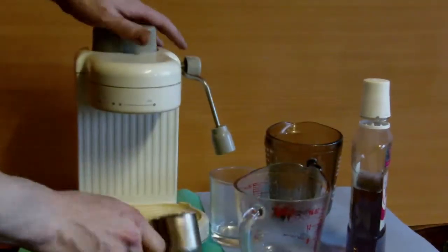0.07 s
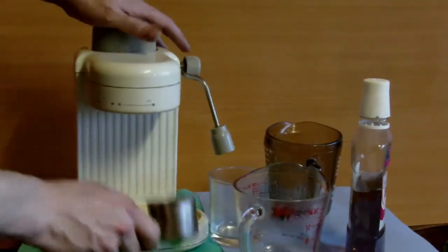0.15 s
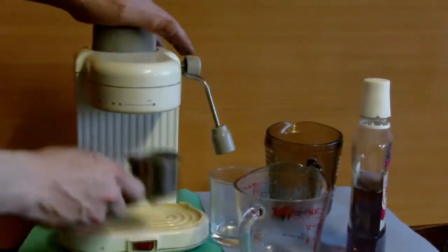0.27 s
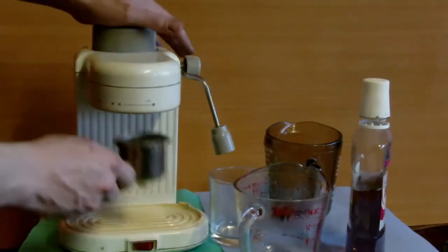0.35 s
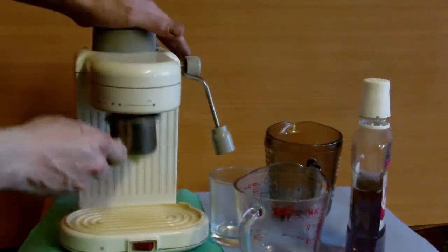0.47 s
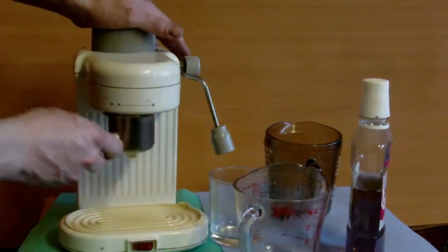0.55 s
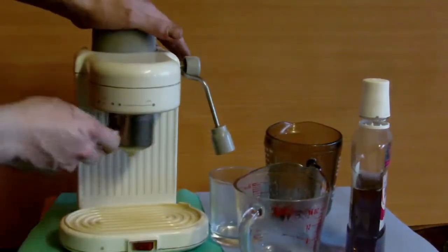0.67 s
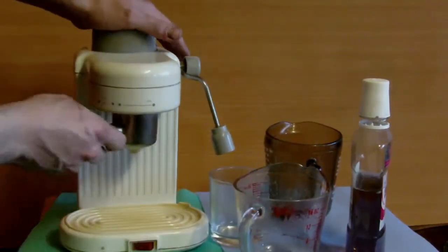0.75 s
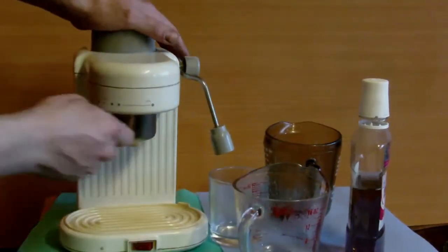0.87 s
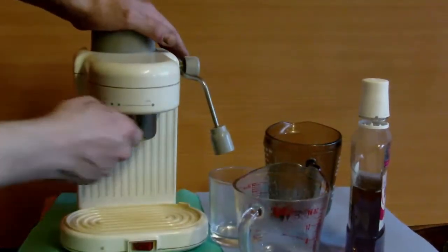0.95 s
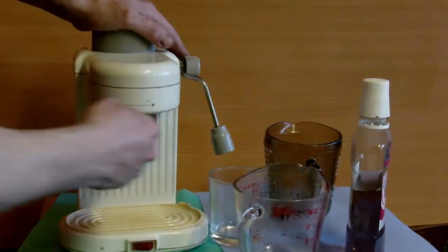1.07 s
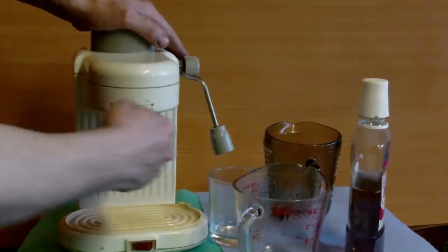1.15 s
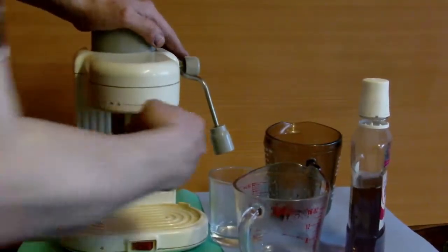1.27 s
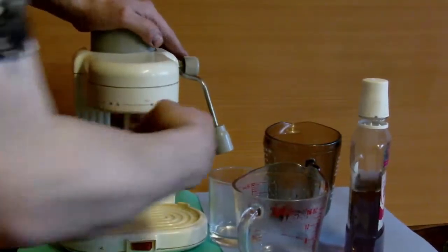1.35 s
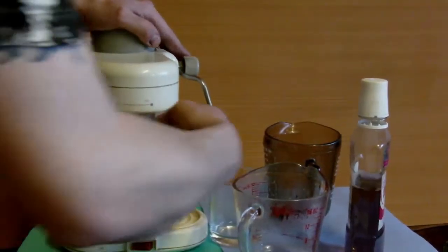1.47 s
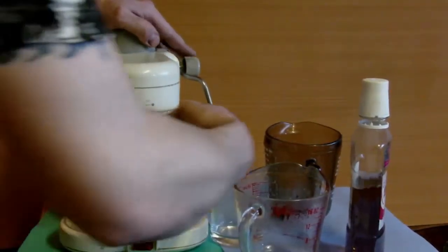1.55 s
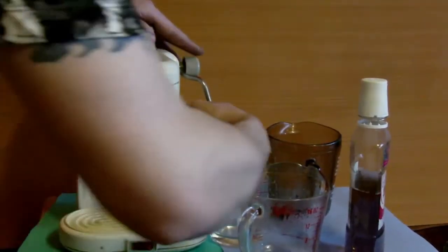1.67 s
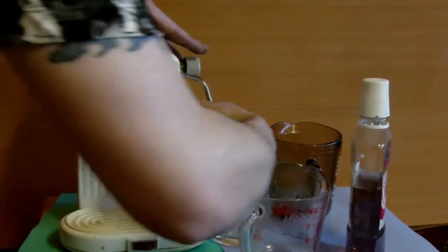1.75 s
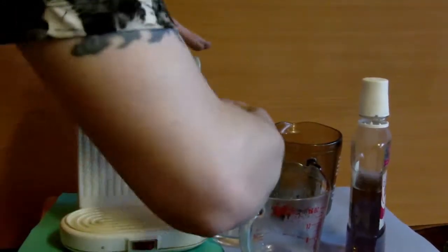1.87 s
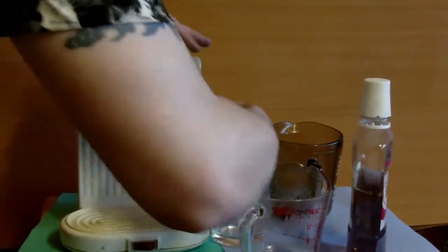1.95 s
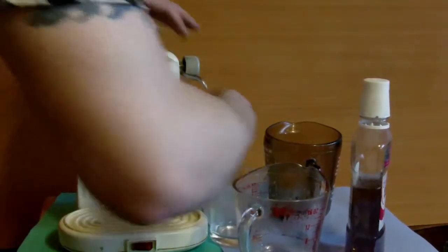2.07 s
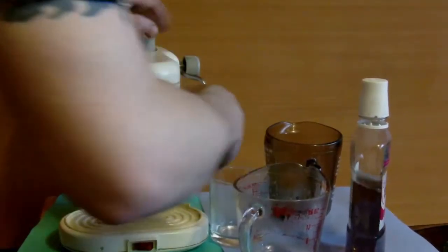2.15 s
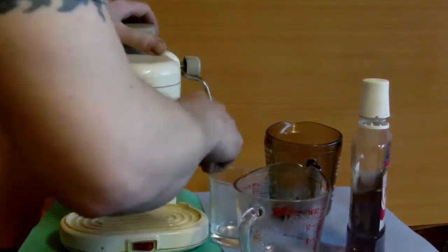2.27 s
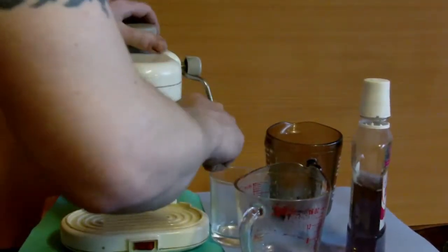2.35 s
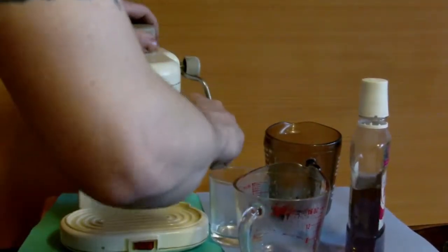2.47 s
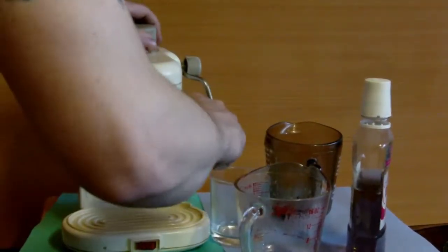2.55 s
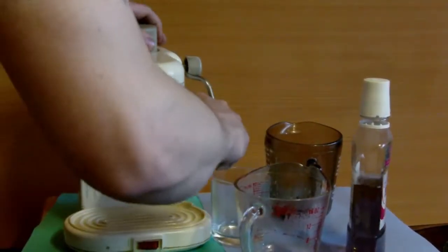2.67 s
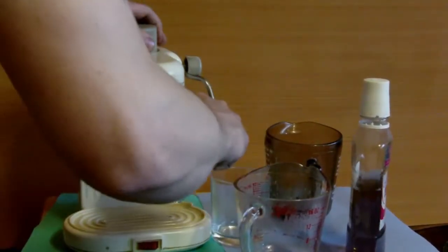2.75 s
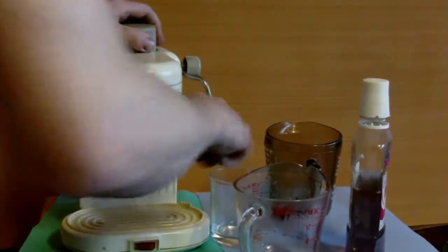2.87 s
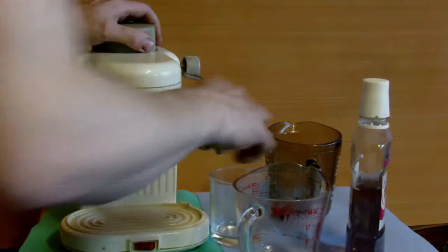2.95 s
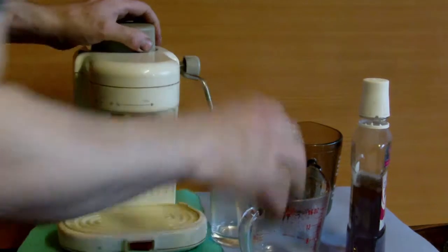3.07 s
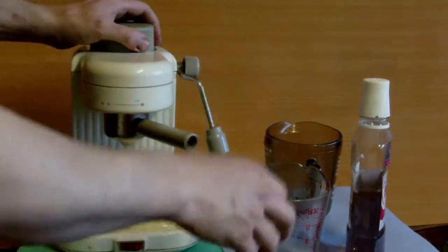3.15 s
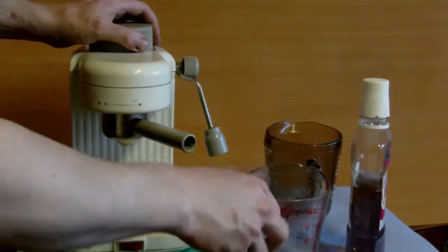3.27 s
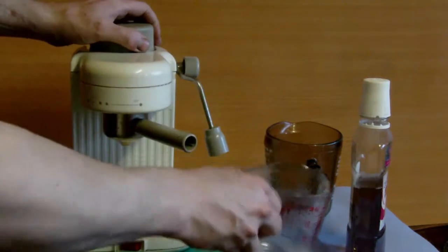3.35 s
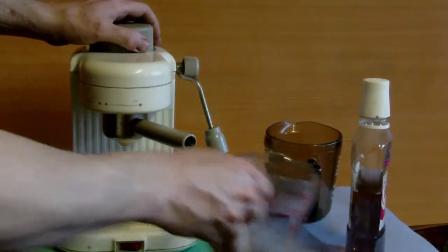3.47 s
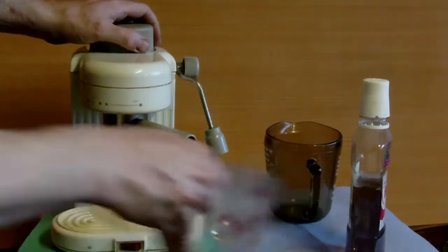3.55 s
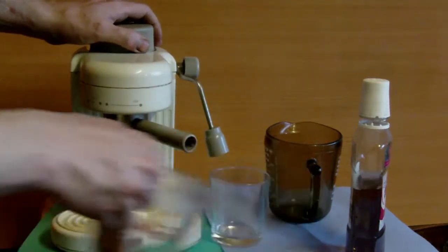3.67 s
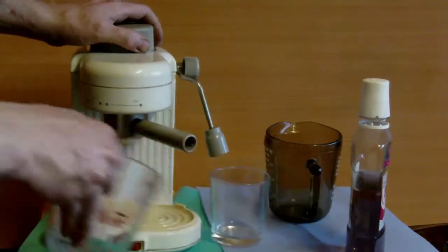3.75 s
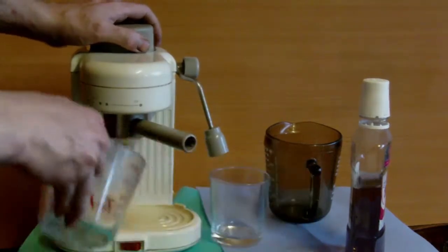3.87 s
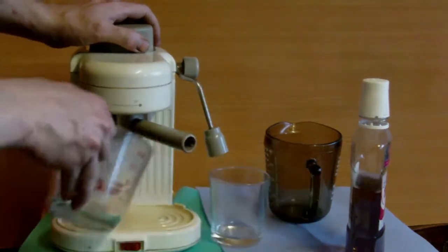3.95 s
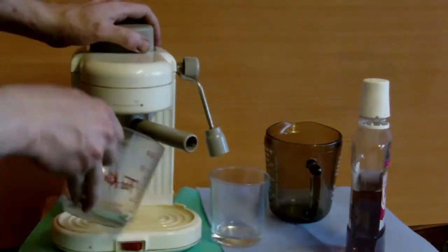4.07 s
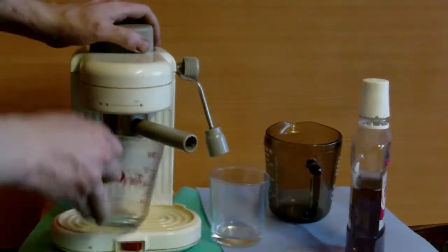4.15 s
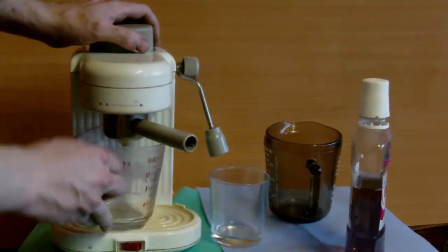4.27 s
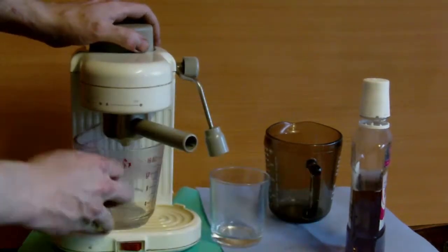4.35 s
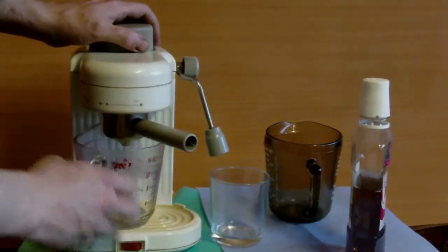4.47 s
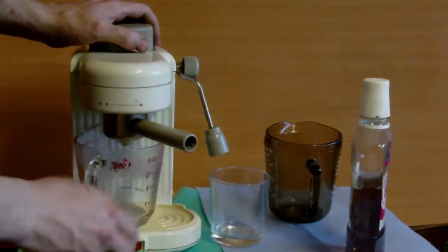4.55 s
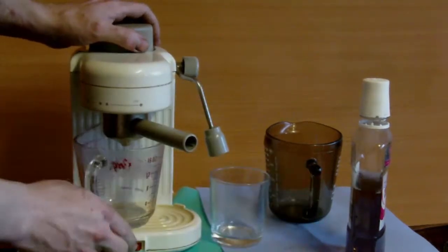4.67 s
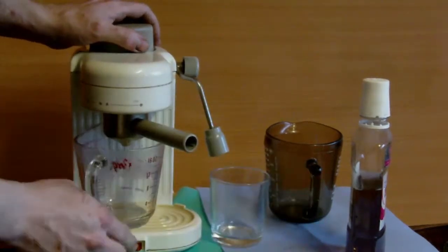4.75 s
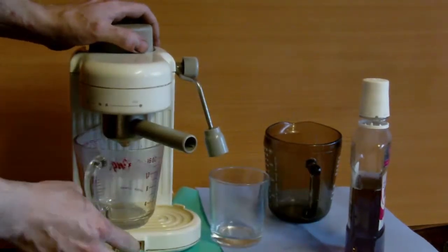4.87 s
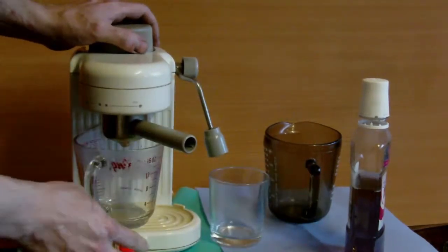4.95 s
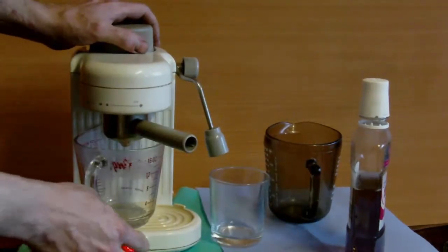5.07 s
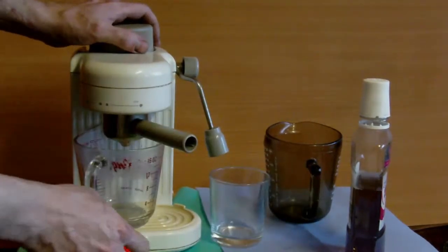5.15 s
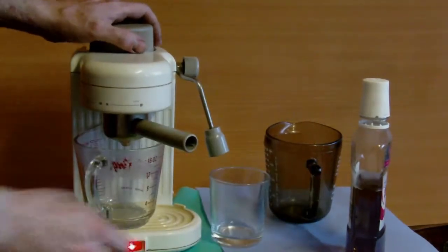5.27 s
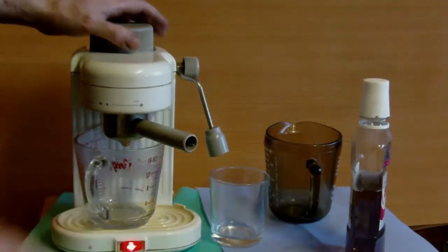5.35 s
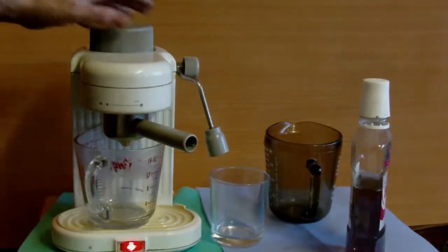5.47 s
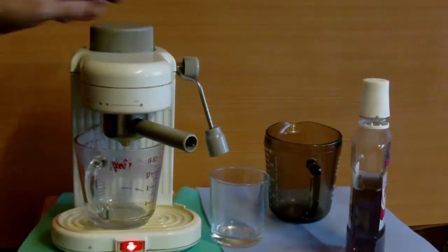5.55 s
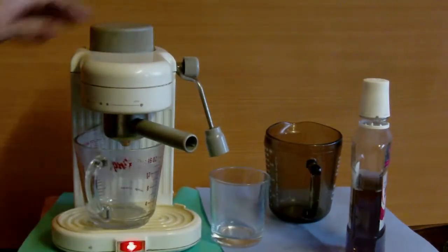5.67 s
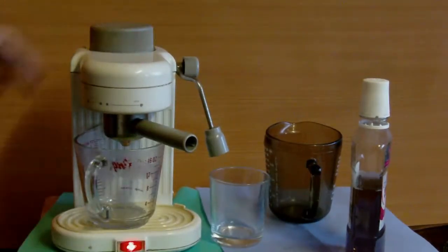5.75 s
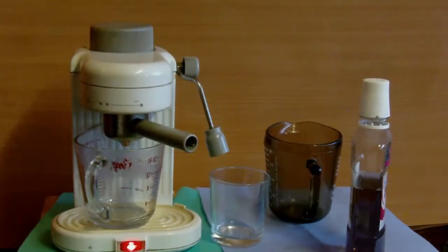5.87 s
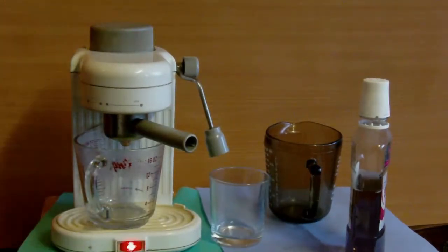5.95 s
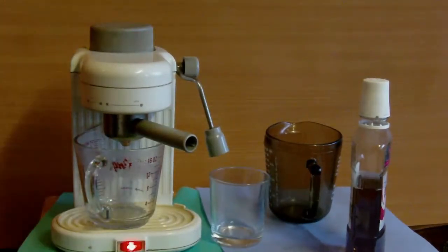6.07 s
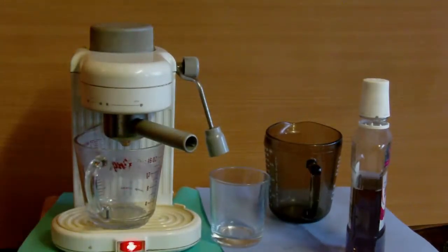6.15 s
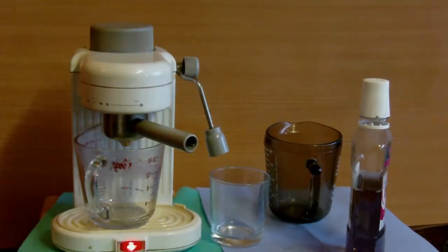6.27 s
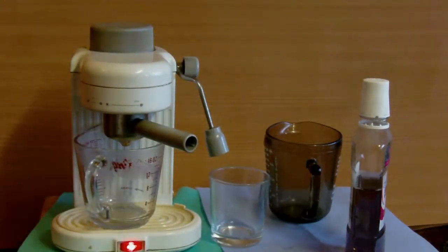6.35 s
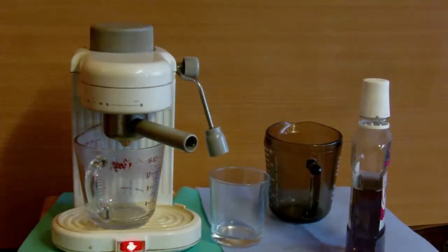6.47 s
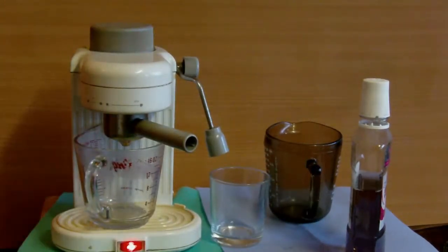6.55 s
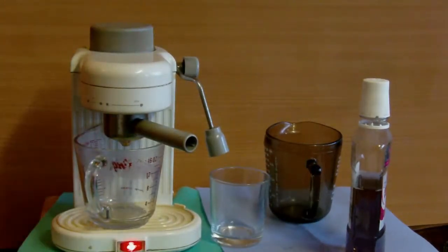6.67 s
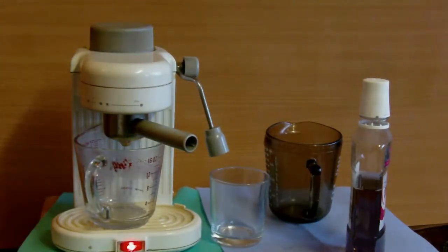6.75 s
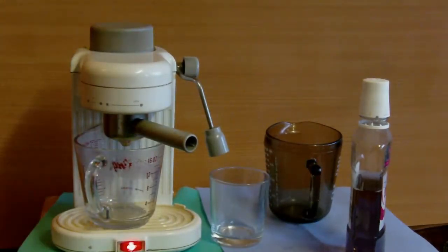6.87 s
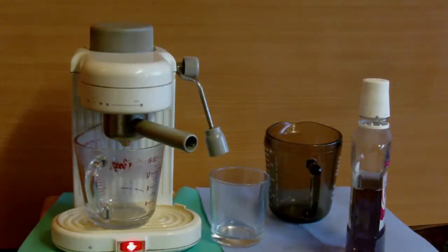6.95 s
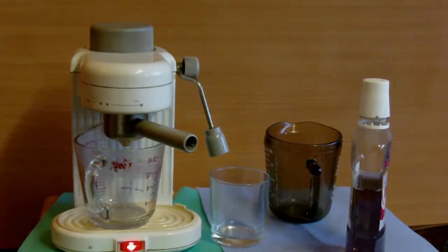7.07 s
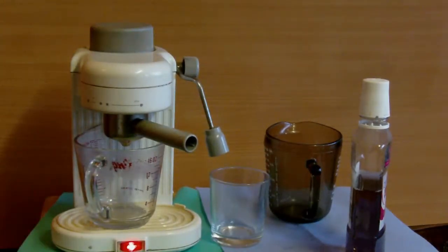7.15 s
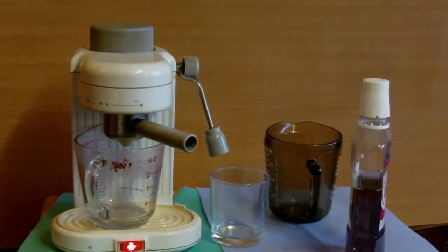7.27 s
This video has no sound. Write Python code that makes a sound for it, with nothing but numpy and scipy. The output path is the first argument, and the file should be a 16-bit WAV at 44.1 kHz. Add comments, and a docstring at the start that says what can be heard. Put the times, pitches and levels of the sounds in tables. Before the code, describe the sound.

A metal coffee holder grinds and squeaks into an espresso machine, a glass jug clatters onto the tray, and a switch snaps.

```python
"""The scene opens on a steel coffee holder's dying ring and one quick knock on a plastic machine.
The holder rattles, grinds and squeals by stick-slip friction as it is twisted tight. A glass jug is
tipped under it onto the drip tray, the power switch snaps, and a soft hiss swells at the end. Each
impact excites the damped normal modes of the object struck. The small kitchen reverberates and hums
faintly, and a close microphone overloads on the hardest blows."""
import sys
import numpy as np
from scipy import signal
from scipy.fft import rfft, irfft
from scipy.io import wavfile
from scipy.ndimage import uniform_filter1d

SR = 44100
rng = np.random.default_rng(int(sys.argv[2]) if len(sys.argv) > 2 else 0)


def pcm_store(signal):
    """Save signal as 16-bit PCM."""
    levels = np.round(np.clip(np.atleast_2d(signal), -1, 1) * 32767)
    wavfile.write(sys.argv[1], SR, levels.astype(np.int16).T)


N = 321930


def amp(db):
    """Amplitude ratio of a level in decibels."""
    return 10 ** (np.asarray(db) / 20)


def unit_rms(x):
    """Normalisation to unit mean power."""
    return x / np.sqrt(np.mean(x ** 2) + 1e-20)


def curve_at(points, hz):
    """Interpolation on a logarithmic frequency axis."""
    f, value = np.transpose(points)
    return np.interp(np.log(hz + 1), np.log(f + 1), value)


def add(mix, s, sound):
    """Superposition of a sound starting at s seconds."""
    part = mix[round(s * SR):][:len(sound)]
    part += sound[:len(part)]


def colour(x, spectrum):
    """Minimum-phase filter: the phase is the Hilbert transform of the log gain."""
    size = 2 * len(x)
    log_gain = np.log(amp(curve_at(spectrum, abs(np.fft.fftfreq(size, 1 / SR)))))
    response = np.exp(np.conj(signal.hilbert(log_gain)))
    return np.fft.ifft(np.fft.fft(x, size) * response).real[:len(x)]


def hump(t, rise, fall):
    """Asymmetric Gaussian envelope peaking at t = 0."""
    return np.exp(-.5 * (t / np.where(t < 0, rise, fall)) ** 2)


def swells(rows):
    """Incoherent addition: overlapping envelopes sum in power."""
    t = np.arange(N) / SR
    return np.sqrt(sum((amp(db) * hump(t - s, rise, fall)) ** 2 for s, db, rise, fall in rows))


def noise(spectrum):
    """Spectral shaping of white noise, at unit power."""
    gain = amp(curve_at(spectrum, np.fft.rfftfreq(N, 1 / SR)))
    return unit_rms(irfft(rfft(rng.standard_normal(N)) * gain, N))


def hums(bands):
    """Narrow-band noise: neighbouring components beat, so each tone wavers."""
    hz, out = np.fft.rfftfreq(N, 1 / SR), np.zeros(N)
    for centre, width, db in bands:
        band = rfft(rng.standard_normal(N)) / (1 + ((hz - centre) / (width / 2)) ** 2)
        out += amp(db) * unit_rms(irfft(band, N))
    return out


def ringing(modes, rough, detune=0., spot_db=1.8, steady_hz=3300):
    """Modal decay: the contact point weights the modes, and a loose grip makes the low ones flutter."""
    t = np.arange(SR // 4) / SR
    phases = rng.random(len(modes))
    pitches, spots = rng.standard_normal((2, len(modes)))
    flutters = uniform_filter1d(rng.standard_normal((len(modes), len(t))), 160, axis=1) * np.sqrt(160)
    out = np.zeros(len(t))
    for (hz, db, t60), phase, pitch, spot, flutter in zip(modes, phases, pitches, spots, flutters):
        hz *= 1 + detune * pitch
        decay = amp(db + spot_db * spot - 60 * t / t60)
        wobble = 1 + rough * min(1, steady_hz / hz) * flutter
        out += decay * wobble * np.sin(2 * np.pi * (hz * t + phase))
    return out


# Spectrum of the dry snap of a contact: f/Hz, level/dB
CONTACT_SPECTRUM = [(110, -27), (200, -18.5), (600, 11.5), (1250, -2), (2200, -2.5), (4000, -12.5),
                    (9000, -17.5), (16000, -49)]

def impacts(blows, modes, contact_s, ring_db, rough,
            detune=.0064, middle_hz=1400, treble_hz=5000, top_db=0):
    """Impact excitation: a snap dies as the modes build up; bass and treble are relative to middle_hz."""
    out, t = np.zeros(N), np.arange(SR // 4) / SR
    attack, fade = 1 - np.exp(-t / .00091), np.exp(-t / contact_s)
    for s, db, bass_db, treble_db in blows:
        snap = colour(attack * fade * rng.standard_normal(len(t)), CONTACT_SPECTRUM)
        ring = (1 - fade ** 3) * ringing(modes, rough, detune)
        sound = snap / abs(snap).max() + amp(ring_db) * ring / abs(ring).max()
        tilt = [(550, bass_db), (middle_hz, 0), (treble_hz, treble_db), (16000, treble_db + top_db)]
        add(out, s, amp(db) * colour(sound, tilt))
    return out


# Spectrum of the room's air: f/Hz, level/dB
AIR_SPECTRUM = [(25, -45), (70, -26), (110, -19), (165, -21), (230, -5.5), (480, -1.5), (800, -1),
                (1150, -0.5), (1600, -4), (3000, -8.5), (5000, -16), (10000, -22), (13500, -35.5),
                (16000, -21)]
# Constant hums: f/Hz, width/Hz, level/dB
ROOM_HUMS = [(208, 5.6, -69.5), (396, 2.1, -60.5), (783, 14, -59), (1108, 8.9, -55.5), (11870, 650, -67.5)]
# Whines that rise around the snap of the switch, then fade: f/Hz, width/Hz, level/dB
WHINES = [(4970, 150, -62), (5420, 170, -63.5)]

def room_tone():
    """Ambient noise: a gently drifting broadband floor under narrow bands."""
    drift = amp(.6 * unit_rms(uniform_filter1d(rng.standard_normal(N), 6000)))
    whine_gain = np.interp(np.arange(N) / SR, [4.6, 4.8, 6.2, 6.6], [.34, .8, 1, .49])
    return amp(-44) * drift * noise(AIR_SPECTRUM) + hums(ROOM_HUMS) + whine_gain * hums(WHINES)


# Reverberation time of the kitchen: f/Hz, T60/s
KITCHEN_DECAY = [(200, 0.26), (700, 0.34), (2000, 0.28), (5000, 0.27), (12000, 0.19)]

def reflections(direct, wall_s=.0155, wall_db=-21.5, tail_db=-9):
    """Reverberation: a slap from the opposite wall, and diffuse echoes decaying band by band."""
    slap, echoes = np.zeros(N), np.zeros(SR // 2)
    add(slap, wall_s, amp(wall_db) * direct)
    slots = np.arange(200, SR // 2 - 20, 20)
    echoes[slots + rng.integers(0, 20, len(slots))] = rng.choice([-1., 1.], len(slots))
    hz, t, bands = signal.stft(echoes, SR, nperseg=256)
    decay = amp(-60 * t / curve_at(KITCHEN_DECAY, hz)[:, None])
    tail = signal.istft(bands * decay, SR, nperseg=256)[1]
    return slap + amp(tail_db) * signal.fftconvolve(direct, tail / np.linalg.norm(tail))[:N]


# Waves of the hiss: t/s of the peak, level/dB, rise/s, fall/s
HISS_WAVES = [(6.53, -49, 0.13, 0.081), (6.82, -46, 0.059, 0.1), (7.32, -41, 0.17, .1)]
# Its spectrum: f/Hz, level/dB
HISS_SPECTRUM = [(1200, -24), (2300, -2.5), (4600, -0.5), (7500, -2.5), (9500, -3), (11500, -13.5),
                 (16000, -28)]
# Hums of the heater: f/Hz, width/Hz, level/dB
HEATER_HUMS = [(402, 11, -59.5), (1087, 18, -59.5)]

def hiss(start_s=5.74, ramp_s=.41, bed_db=-55):
    """Amplitude modulation: bright noise swells over a steady bed that fades in with the heater's hum."""
    ramp = np.clip((np.arange(N) / SR - start_s) / ramp_s, 0, 1)
    envelope = np.hypot(swells(HISS_WAVES), amp(bed_db) * ramp)
    return envelope * noise(HISS_SPECTRUM) + ramp * hums(HEATER_HUMS)


# Pushes of hand and sleeve: t/s of the peak, level/dB, rise/s, fall/s
PUSHES = [(.01, -30.5, 0.039, 0.021), (1.1, -39, 0.13, 0.12), (1.4, -39.5, 0.05, 0.13),
          (2.57, -35.5, 0.046, 0.054), (3.06, -46, 0.081, 0.074), (4.33, -24.5, 0.063, 0.049),
          (5.27, -49, 0.042, 0.17)]
# Their spectrum: f/Hz, level/dB
RUB_SPECTRUM = [(150, -51), (260, 4), (800, 7.5), (1200, 6.5), (1700, -4), (3000, -6.5), (15000, -37)]

def hand_rub():
    """Friction noise: uneven rubbing, filtered by the hollow housing."""
    lumps = amp(2.17 * unit_rms(uniform_filter1d(rng.standard_normal(N), 500)))
    return swells(PUSHES) * lumps * noise(RUB_SPECTRUM)


# Booms of hollow parts: t/s of the peak, level/dB, f/Hz
BOOMS = [(.686, -24, 233), (.802, -20.5, 280), (1.125, -26.5, 783), (4.187, -13.5, 830),
         (4.328, -19.5, 254)]

def booms(rise_s=.00074, fall_s=.0074):
    """Damped resonance: a hollow part answers a push with a short, soft-edged tone."""
    out, t = np.zeros(N), np.arange(-SR // 20, SR // 10) / SR
    for s, db, hz in BOOMS:
        tone = np.sin(2 * np.pi * (hz * t + rng.random()))
        add(out, s + t[0], amp(db) * hump(t, rise_s, fall_s) * tone)
    return out


# Small clinks, the bright overtones of the struck jug, and its lingering ring: t/s, level/dB, f/Hz
THIN_TONES = [(1.147, -48, 8910), (2.575, -33, 2400), (2.572, -40, 5080), (2.669, -44, 5450),
              (3.919, -21, 6770), (3.92, -33, 10170), (4.008, -23, 1485)]
# Taps on the jug's free rim: t/s, level/dB
RIM_TAPS = [(3.076, -33), (4.322, -27)]
# Modes of the rim: f/Hz, level/dB, T60/s
RIM_MODES = [(1324, 0, .16), (3352, -2, 0.25), (6795, -11, 0.12)]

def thin_ringing(t60_s=.15):
    """Free vibration: single modes decay as thin tones, and the jug's rim pings."""
    out = np.zeros(N)
    for s, db, hz in THIN_TONES:
        add(out, s, ringing([(hz, db, t60_s)], rough=.45))
    for s, db in RIM_TAPS:
        add(out, s, amp(db) * ringing(RIM_MODES, rough=.12))
    return out


# Knocks on the housing: t/s, level/dB, bass/dB, treble/dB
HOUSING_BLOWS = [(1.3341, -18, -6.5, 12.5), (1.9055, -22.5, -11.5, 13.5), (2.0103, -9, -28, -16),
                 (2.039, -17.5, -20, -11), (2.143, -16, -22, -41), (2.5665, -21, -6, 1.5),
                 (2.5832, -23, -27, -6), (2.6652, -26.5, -10, 17), (6.2023, -35.5, -16, 18)]
# Its modes: f/Hz, level/dB, T60/s
HOUSING_MODES = [(705, 16, 0.13), (1107, 11, 0.23), (1680, 0.5, 0.038), (1980, -22, 0.048),
                 (2500, 3, 0.026), (2970, -4, 0.018)]

def housing_knocks():
    """Shell vibration: long contacts on plastic give more snap than ring."""
    return impacts(HOUSING_BLOWS, HOUSING_MODES, contact_s=.0074, ring_db=-8.5, rough=.99,
                   treble_hz=3070, top_db=-6)


# Snaps of the power switch: t/s, level/dB, bass/dB, treble/dB
SWITCH_SNAPS = [(4.8429, -21.5, -9, 9.5), (4.868, -26, 1, 10), (4.8832, -4.5, -17.5, 1),
                (4.8865, 3.5, -15, 3.5)]
# Its modes: f/Hz, level/dB, T60/s
SWITCH_MODES = [(680, 3.5, 0.097), (1046, 4.5, 0.089), (1309, 4.5, 0.041), (1840, 10, 0.019),
                (2175, 3.5, 0.026), (2934, -1, 0.024), (3584, 0, 0.03)]

def switch_snaps():
    """Transient excitation: two faint ticks, then a hard double snap, ring the switch."""
    return impacts(SWITCH_SNAPS, SWITCH_MODES, contact_s=.0033, ring_db=-2, rough=.95)


# Blows on the drip tray: t/s, level/dB, bass/dB, treble/dB
TRAY_BLOWS = [(4.1128, 1.5, -6, -5.5), (4.1682, -5.5, -3.5, 1.5), (4.2453, -5.5, -9, -7),
              (4.2712, 1, -12.5, -9.5), (4.3056, -1.5, -30, -16), (4.3201, 4.5, -22, -8.5),
              (4.3314, -18, 8.5, -31), (4.3545, -1.5, -15, -19)]
# Its modes: f/Hz, level/dB, T60/s
TRAY_MODES = [(275, -10, 0.076), (524, -6, 0.15), (924, 3, 0.06), (1145, -0.5, 0.1), (1300, 5.5, 0.036),
              (2053, -1, 0.024), (2910, -15, 0.044), (3550, 4, 0.013)]

def tray_clatter():
    """Plate vibration: the tray rings briefly under the jug."""
    return impacts(TRAY_BLOWS, TRAY_MODES, contact_s=.0022, ring_db=-1.5, rough=1., middle_hz=2010)


# Blows on the jug, the first followed by its dull slap off the wall: t/s, level/dB, bass/dB, treble/dB
JUG_BLOWS_AND_SLAP = [(3.9185, 11, -10.5, -5.5), (3.9334, -3, 0, -29), (3.947, -21, -17, -13),
                      (3.9705, 2, -3, -4.5)]
# The jug's modes: f/Hz, level/dB, T60/s
JUG_MODES = [(617, 0, 0.055), (712, 8, 0.14), (860, 0, 0.16), (1306.5, 11.5, 0.087), (1485, 9.5, 0.1),
             (2260, -7, 0.13)]

def jug_knocks():
    """Bending modes: the struck glass rings with little flutter."""
    return impacts(JUG_BLOWS_AND_SLAP, JUG_MODES, contact_s=.0025, ring_db=-2.5, rough=.43, detune=.0075)


# Rattles of the holder's basket: t/s, level/dB, bass/dB, treble/dB
BASKET_RATTLES = [(0.199, -26, -7, 4), (0.2203, -11, -21, -27), (0.2363, -28.5, -6, 12),
                  (0.3256, -14.5, -20.5, -30), (0.3639, -28, -11, 13), (0.962, -27.5, -22, 0),
                  (0.4866, -19, -13, 3)]
# Its modes: f/Hz, level/dB, T60/s
BASKET_MODES = [(4850, -6, 0.1), (7330, -1, 0.056), (9720, -1, 0.03), (11300, -4, 0.03)]

def basket_rattle():
    """Impulse excitation: very short contacts faintly ring the basket's high modes."""
    return impacts(BASKET_RATTLES, BASKET_MODES, contact_s=.0015, ring_db=-16, rough=.9)


# Squeals of the seated holder: t/s of the peak, level/dB, f/Hz, fall/ms
SQUEALS = [(0.506, -12.5, 1250, 4.1), (0.598, -5.5, 1300, 4.9), (0.619, -0.5, 1230, 11.3),
           (0.678, 2, 1220, 5), (0.712, -4.5, 1150, 3.4), (0.738, -0.5, 1250, 4.8),
           (0.766, -6.5, 1230, 4.8)]

def holder_squeals(rise_share=.63, pitch_spread=.0415):
    """Stick-slip oscillation locks onto the cup's air resonance: a rough, wavering tone."""
    out, t = np.zeros(N), np.arange(-SR // 20, SR // 20) / SR
    for s, db, hz, fall_ms in SQUEALS:
        waver, grip = map(unit_rms, uniform_filter1d(rng.standard_normal((2, len(t))), 100, axis=1))
        envelope = hump(1000 * t, rise_share * fall_ms, fall_ms) * amp(2.5 * grip)
        phase = 2 * np.pi * np.cumsum(hz * (1 + pitch_spread * waver)) / SR
        add(out, s + t[0], amp(db) * envelope * np.sin(phase))
    return out


# Envelope of steel grinding in its socket: t/s, level/dB
GRIND_LEVEL = [(.46, -27), (.56, -38), (.63, -25), (.7, -12.5), (.75, -24.5), (.8, -14), (.85, -25.5),
               (.91, -31), (.98, -42)]
# Modes of the steel holder, also rung by its chatter and knocks: f/Hz, level/dB, T60/s
HOLDER_MODES = [(272, -6, 0.12), (527, -4.5, 0.11), (644, -11, 0.29), (840, 9, 0.057), (1027, 8, 0.034),
                (1195, 7.5, 0.049), (1942, -1.5, 0.046), (2288, -10, 0.05), (3920, -6, 0.039),
                (4360, 0.5, 0.025), (5920, -8, 0.086), (7160, -10.5, 0.04), (9100, -13, 0.054),
                (10900, -20, .04), (12800, -19, 0.035)]

def holder_grind(slips_per_s=1700, spread_db=2, contact_points=4):
    """Sliding friction: dense random slips scratch, and ring the holder from several contact points."""
    times, levels = np.transpose(GRIND_LEVEL)
    t = np.arange(times[0], times[-1], 1 / SR)
    n = len(t)
    envelope = signal.windows.tukey(n, .08) * amp(np.interp(t, times, levels))
    kick, chance, size = rng.standard_normal(SR), rng.random(SR), rng.exponential(1, SR)
    slips = (kick * amp(spread_db * size) * (chance < slips_per_s / SR))[:n]
    point = rng.integers(0, contact_points, SR)[:n]
    ring = sum(signal.fftconvolve(slips * (point == k), ringing(HOLDER_MODES, rough=.4, detune=.004))[:n]
               for k in range(contact_points))
    scratch = amp(-1.5) * unit_rms(colour(slips, CONTACT_SPECTRUM))
    out = np.zeros(N)
    add(out, times[0], envelope * unit_rms(unit_rms(ring) + scratch))
    return out


# Bursts of chatter: t/s, duration/s, level/dB
CHATTERS = [(0.537, .018, -5.5), (0.782, .022, -4.5), (0.817, 0.011, -16.5)]

def holder_chatter(gap_s=.0058, spread_db=4, bass_db=-11.5, treble_db=-2):
    """Repeated rebound: the holder bounces quickly and unevenly against its seat."""
    blows = []
    for start, duration, db in CHATTERS:
        lateness, strengths = rng.random(8), rng.standard_normal(8)
        times = start + gap_s * (np.arange(8) + .5 * lateness)
        blows += [(s, db + spread_db * strength, bass_db, treble_db)
                  for s, strength in zip(times, strengths) if s < start + duration]
    return impacts(blows, HOLDER_MODES, contact_s=.0031, ring_db=0, rough=.98)


# The holder's opening ring, then its blows: t/s, level/dB, bass/dB, treble/dB
HOLDER_RING_AND_BLOWS = [(0.0034, -7, -18, -26), (0.0153, -8, -20, -5), (0.4657, -6, 0, -11.5),
                         (0.5028, -20.5, 5, 6), (0.5353, -2.5, -20, -13), (0.5935, -1.5, -14, -9),
                         (0.607, 0, -9.5, -7), (0.616, -1, -10.5, 0.5), (0.6645, -9, -24, 6),
                         (0.6854, 0, -8.5, -8), (0.7035, -7.5, -10, 2), (0.7285, 0, -14.5, -4.5),
                         (0.7636, -12, -6, 8), (0.8032, -1, -13.5, -6), (0.847, -7, -11.5, -3.5),
                         (0.8712, -11, -4, -13)]

def holder_knocks():
    """Modal response to impact: the steel holder rings as it strikes the machine's head."""
    return impacts(HOLDER_RING_AND_BLOWS, HOLDER_MODES, contact_s=.0054, ring_db=2, rough=.85)


def scene():
    """Superposition of direct sound, its reflections and the soft noises, in one channel."""
    direct = basket_rattle() + holder_knocks() + holder_chatter()
    direct += jug_knocks() + tray_clatter() + housing_knocks() + switch_snaps()
    direct += holder_squeals() + thin_ringing() + booms() + holder_grind()
    bass_cut = signal.butter(6, 215, "high", fs=SR, output="sos")  # small objects radiate no deep bass
    direct = signal.sosfilt(bass_cut, direct)
    return (direct + reflections(direct) + hand_rub() + hiss() + room_tone())[None]


def record(dry, dip_hz=7900, dip_width_hz=300, mic_top_hz=15750, band_limit_hz=16200):
    """Saturation: the microphone, with its housing dip and treble limit, clips; a low-pass follows."""
    heard = signal.lfilter(*signal.iirnotch(dip_hz, dip_hz / dip_width_hz, fs=SR), dry)
    heard = signal.oaconvolve(heard, signal.firwin(255, mic_top_hz, fs=SR)[None], "same")
    clipped = np.clip(heard, -.995, .995)
    low_pass = signal.firwin(511, band_limit_hz, window=("kaiser", 9), fs=SR)
    return signal.oaconvolve(clipped, low_pass[None], "same")


dry = scene()
out = record(dry)
pcm_store(out)
```